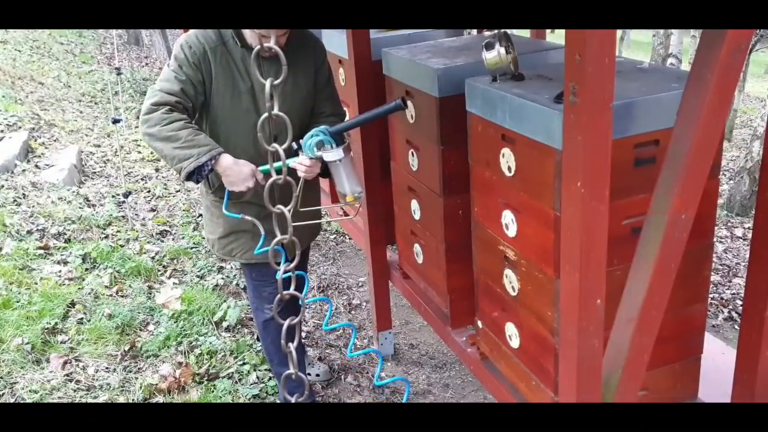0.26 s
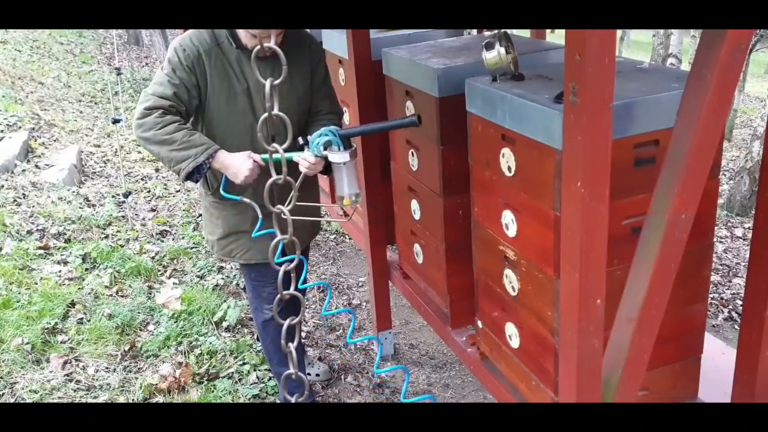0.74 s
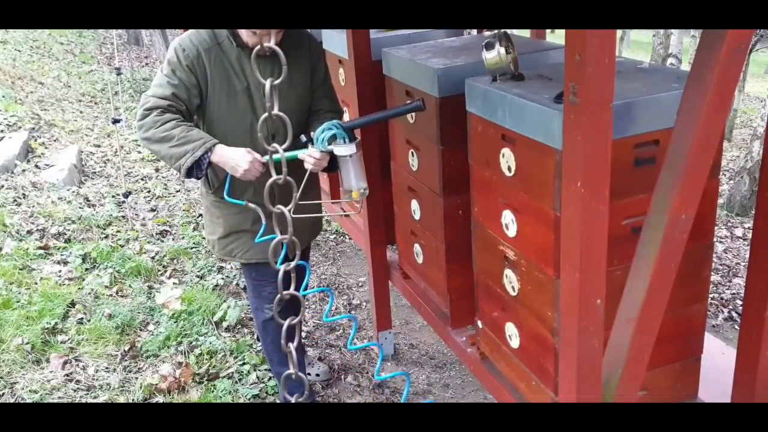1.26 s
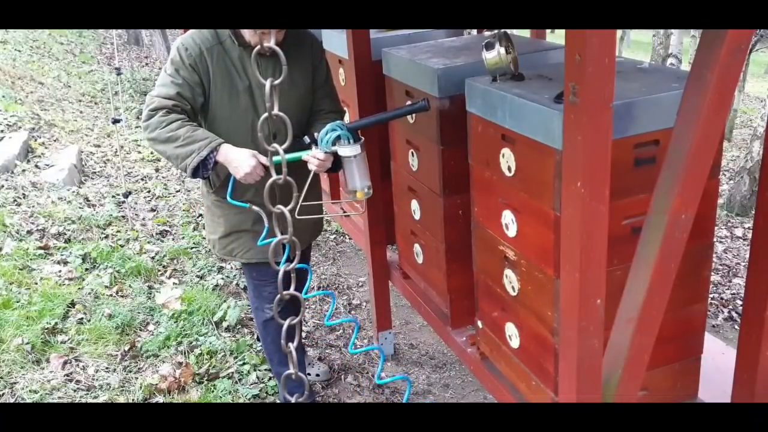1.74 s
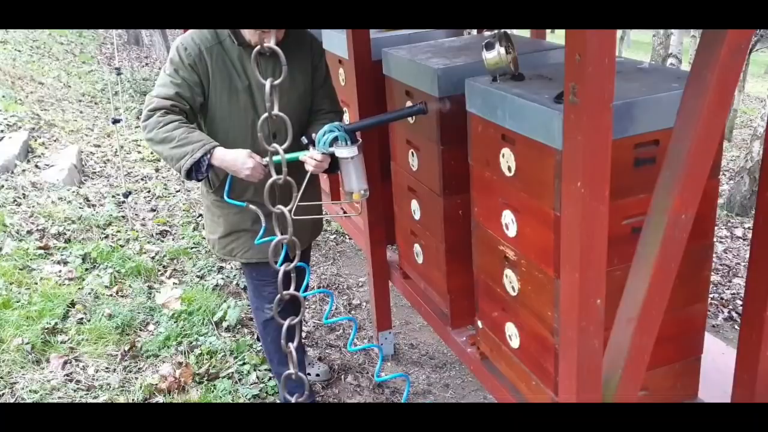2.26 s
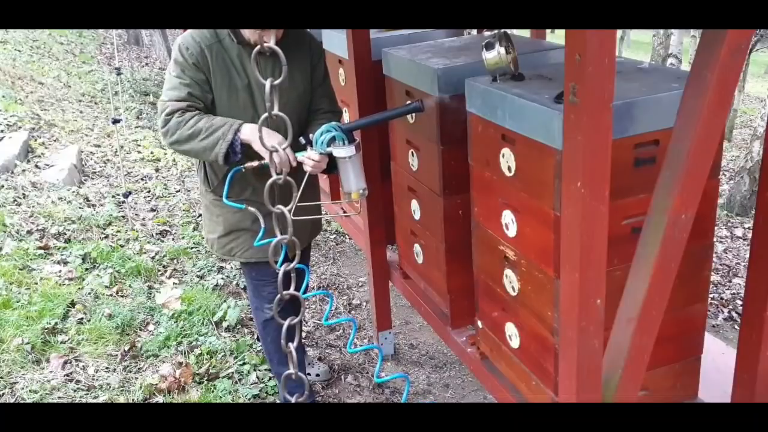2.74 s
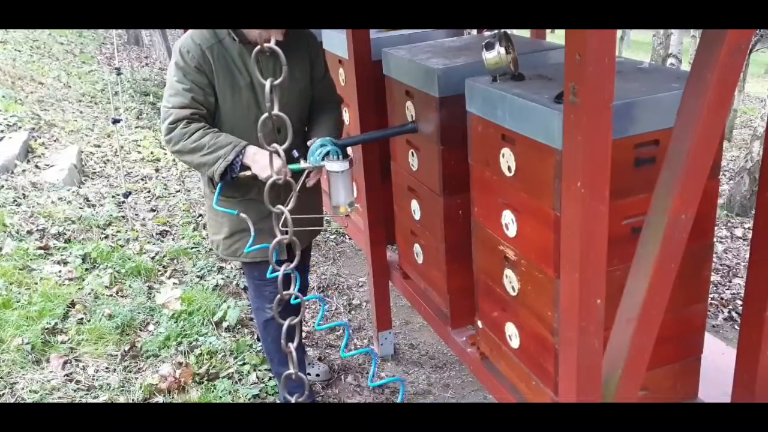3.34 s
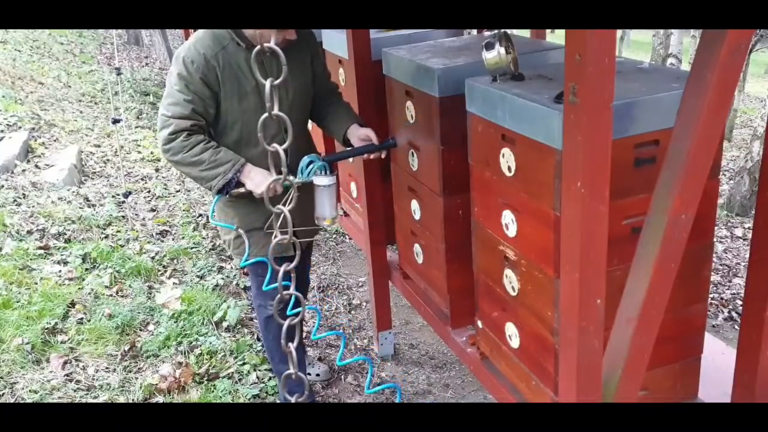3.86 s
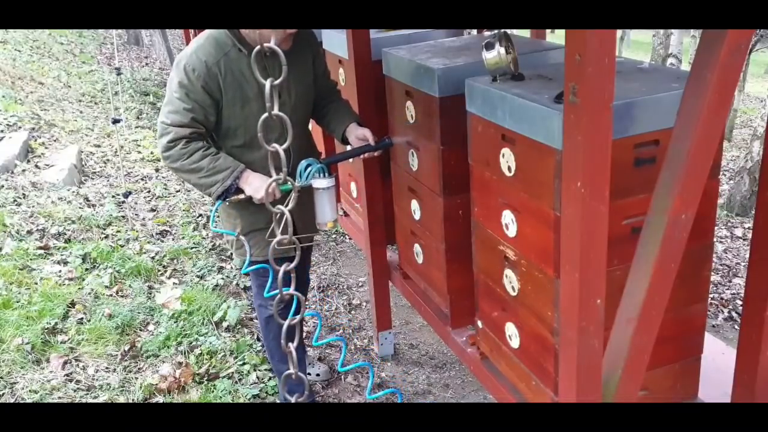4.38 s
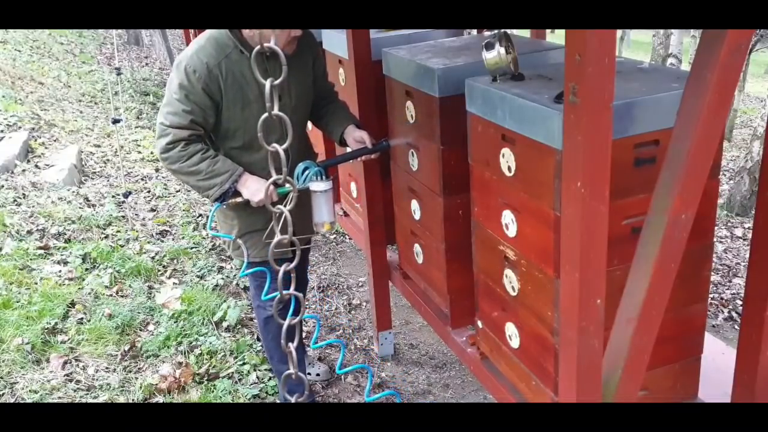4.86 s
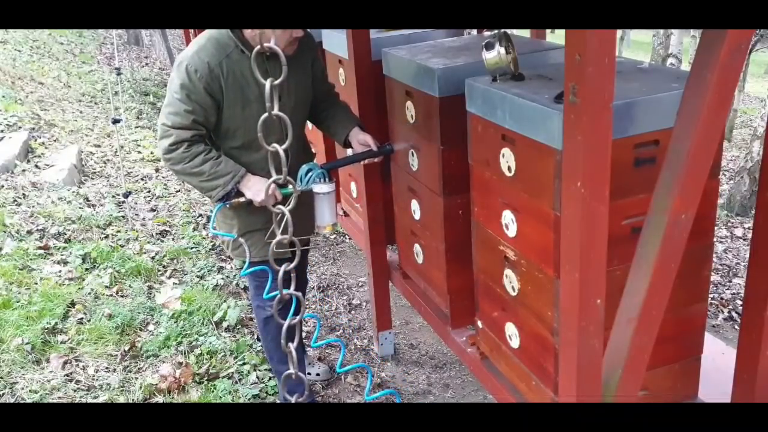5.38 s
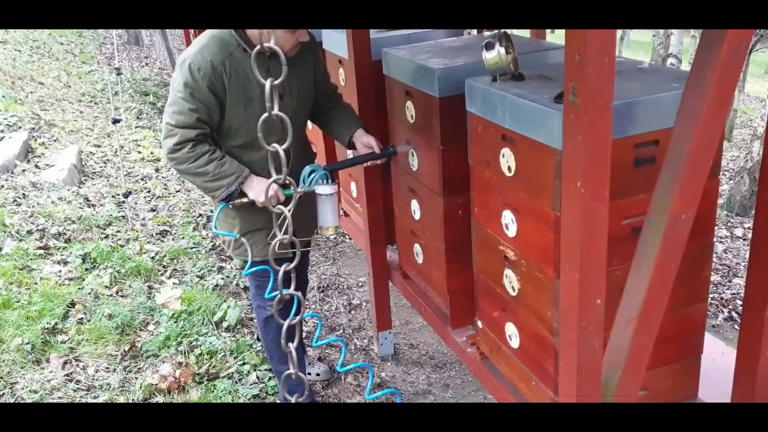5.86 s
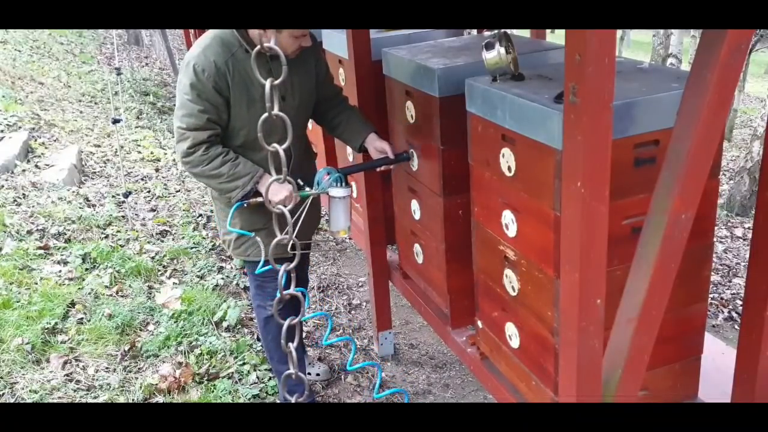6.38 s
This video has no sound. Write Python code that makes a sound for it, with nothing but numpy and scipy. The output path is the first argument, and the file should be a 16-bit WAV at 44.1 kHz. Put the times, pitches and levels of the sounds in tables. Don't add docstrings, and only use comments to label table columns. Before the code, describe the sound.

A compressed-air jet opens in quick jerks beside wooden hive boxes, hissing sharp and bright, then slowly weakening over a faint low engine rumble.

```python
import sys
import numpy as np
from scipy import signal
from scipy.io import wavfile
from scipy.ndimage import uniform_filter1d

SR = 44100
rng = np.random.default_rng(int(sys.argv[2]) if len(sys.argv) > 2 else 0)


def gain_from_decibels(decibels):
    exponent = np.asarray(decibels, float) / 20
    return 10 ** exponent


def digitize_waveform(pressure):
    field = np.atleast_2d(pressure).T
    bounded = np.clip(field, -1, 1)
    quanta = np.round(bounded * 32767).astype(np.int16)
    wavfile.write(sys.argv[1], SR, quanta)


N = 291985
HZ = np.fft.rfftfreq(1024, 1 / SR)[:, None]
FRAME_S = (np.arange(N // 256 + 5) * 256) / SR

# time_s, jet level_db, facing microphone [0-1], striking wood [0-1]
JET = [(.785, -84, 0.7, 0.75), (.82, -82.5, 1, 1), (.93, -75.5, 0.9, 1), (.97, -67, 1, 1),
       (1.06, -60, 0.8, 0.99), (1.31, -52.5, 1, 0.28), (1.5, -50.5, 0.84, 0.24), (1.8, -50, 0.75, 0),
       (2.08, -51.5, 0.75, 0.43), (2.5, -53, 1, 0.44), (2.76, -54, 0.36, 1), (3.3, -55.5, 0.67, 1),
       (3.6, -56.5, 0.45, 0.93), (4.17, -58, 0.1, 0.59), (5.2, -59.5, 0.58, 0.7), (5.45, -59, 0.26, 0.5),
       (6.13, -58.5, 0.08, 0.92), (6.62, -59, 0.4, 0.15)]
# hz, likeness [0-1]
BASS_SAME = [(60, 0.96), (130, 0.49), (290, 0.26), (640, 0.065), (3000, 0.14)]


def evened(x):
    return x / np.sqrt(np.mean(abs(x) ** 2) + 1e-20)


def read(points):
    f, value = np.transpose(points)
    return np.interp(np.log(HZ + 1), np.log(f + 1), value)


def follow(rows, t):
    s, *columns = np.transpose(rows)
    return [np.interp(t, s, c) for c in columns]


def swells(rows, lull_db, t):
    power = sum(gain_from_decibels(2 * db) * np.exp(-(2 * (t - s) / length) ** 2) for s, db, length in rows)
    return 10 * np.log10(power + gain_from_decibels(2 * lull_db))


def patches(bins, frames):
    field = rng.standard_normal((len(FRAME_S), len(HZ))).T
    return evened(uniform_filter1d(uniform_filter1d(field, round(bins), 0), round(frames), 1))


def noise(level_db, same, lead=0.):
    a, b, c, d = rng.standard_normal((len(FRAME_S), len(HZ), 4)).T
    same = np.clip(same, -1, 1)
    left = a + 1j * b
    right = same * left + np.sqrt(1 - same ** 2) * (c + 1j * d)
    right = right * np.exp(-1j * lead)
    spectrum = np.array([left, right]) * gain_from_decibels(level_db)
    return signal.istft(spectrum, nperseg=1024, noverlap=768)[1][:, :N] / 18.5


def band_at_zero(shape_db, lo_hz, hi_hz):
    band = (HZ > lo_hz) & (HZ < hi_hz)
    return shape_db - 10 * np.log10(np.mean(band * gain_from_decibels(shape_db) ** 2))


def fuzzy(hz, db, rough):
    lead_rad, stray_share = -0.36, 0.12
    wander = uniform_filter1d(rng.standard_normal((N // 64 + 1, 4)), 80, 0)
    wander = wander.repeat(64, 0)[:N].T
    shared = rough * evened(wander[0] + 1j * wander[1])
    stray = np.array([[stray_share], [-stray_share]]) * evened(wander[2] + 1j * wander[3])
    phase = 2j * np.pi * np.cumsum(hz) / SR + 1j * lead_rad * np.array([[.5], [-.5]])
    return np.sqrt(2) * gain_from_decibels(db) * ((1 + shared + stray) * np.exp(phase)).real


def engines():
    # middle_s, level_db, length_s
    engine = [(.07, -49.5, 0.12), (.19, -52, 0.11), (.55, -50.5, 0.17), (.73, -47.5, 0.058),
              (.88, -52, 0.075), (1.06, -52, 0.32), (1.24, -52.5, 0.35), (1.62, -50, 0.14),
              (1.84, -58.5, 0.056), (2.08, -53, 0.65), (2.3, -47.5, 0.05), (2.45, -47, 0.029),
              (2.62, -48, 0.12), (2.81, -52, 0.15), (2.98, -47.5, 0.075), (3.25, -48, 0.15),
              (3.62, -52.5, 0.15), (3.88, -51.5, 0.17), (4.09, -54, 0.026), (4.3, -60.5, 0.11),
              (4.52, -53, 0.076), (4.72, -56, 0.12), (5.13, -58.5, 0.33), (5.3, -52, 0.079),
              (5.62, -60, 0.18), (5.8, -57.5, 0.1), (6.23, -52.5, 0.1), (6.55, -55, 0.18)]
    # time_s, pitch_hz
    engine_hz = [(0, 56.4), (.45, 53.3), (1.32, 52.43), (1.55, 53.63), (3.3, 54.58), (3.75, 54.3),
                 (5.85, 55.2), (6.1, 52.97), (6.62, 53.1)]
    # middle_s, level_db, length_s
    octave_swells = [(.5, -62, 0.16), (.88, -56, 0.1), (1.3, -58, 0.12), (4.25, -68.5, 0.12),
                     (5.35, -64.5, 0.18), (6.2, -69, 0.099), (6.55, -72, 0.075)]
    # middle_s, level_db, length_s
    second = [(.16, -58, 0.035), (.6, -58.5, 0.16), (.89, -53.5, 0.053), (1.33, -56.5, 0.086),
              (1.88, -55, 0.071), (2.2, -58.5, 0.49), (2.8, -50.5, 0.049), (3.0, -60, 0.5),
              (3.53, -59.5, 0.085), (3.95, -59.5, 0.43), (4.62, -61, 0.32), (5.22, -56, 0.17),
              (6.25, -61, 0.3)]
    # time_s, pitch_hz, level_db
    drone = [(2.1, 150.6, -79), (2.14, 155.2, -68), (2.178, 154, -71), (2.23, 153.2, -71),
             (2.548, 162, -75.5), (2.7, 150.5, -106)]
    # hz, level_db
    rumble_colour = [(20, -15.5), (45, 18), (86, 11.5), (130, 2), (170, -5), (230, -46), (300, -30),
                     (400, -83)]
    t = np.arange(N) / SR

    hz, db = follow(engine_hz, t)[0], swells(engine, -76, t)
    octave_db = -66 + 3.5 * (53.3 - hz) + 0.23 * (db - db.mean())
    octave_db = 10 * np.log10(gain_from_decibels(2 * octave_db) + gain_from_decibels(2 * swells(octave_swells, -200, t)))
    second_hz, second_db = np.full(N, 66.2), swells(second, -71, t)
    drone_hz, drone_db = follow(drone, t)
    drone_gate = np.clip(8 * np.minimum(t - drone[0][0], drone[-1][0] - t), 0, 1)

    notes = fuzzy(hz, db, 0.35) + fuzzy(2 * hz, octave_db, 0.39)
    notes += fuzzy(second_hz, second_db, 0.54) + fuzzy(2 * second_hz, second_db - 18.5, 0.7)
    notes += fuzzy(drone_hz, drone_db, 1.0) * drone_gate

    rumble_db, fade_db_per_s = -66.5, 0.2
    colour = band_at_zero(read(rumble_colour) - 40 * (HZ > 500), 60, 100)
    rumble_field = colour + rumble_db - fade_db_per_s * FRAME_S + 2.57 * patches(3, 16)
    rumble = noise(rumble_field, read(BASS_SAME))
    pan_db = -4.4 * np.array([[.5], [-.5]])
    return (notes + rumble) * np.minimum(t / .012, 1) * gain_from_decibels(pan_db)


def air():
    # hz, level_db per Hz
    air_colour = [(150, -8), (260, 4), (400, 0), (700, -3), (1400, -9), (2800, -14), (5500, -16),
                  (7600, -17), (8700, -22), (10000, -15), (12000, -12), (16000, -12)]
    # start_s, level_db, length_s
    rustles = [
        (.148, -80.5, .02),
        (.455, -81, .018),
        (.712, -79.5, .03),
    ]
    # middle_s, level_db, length_s, pitch_hz
    rustle_rings = [
        (.158, -82, .02, 7250),
        (.462, -87, .018, 7900),
        (.722, -85, .025, 7600),
    ]

    flat = band_at_zero(-8 * abs(np.log2((HZ + 50) / 7500)), 300, 15700)
    puffs, rings = 0, 0
    for s, db, length in rustles:
        puffs = puffs + gain_from_decibels(2 * db) * np.exp(-((FRAME_S - s - length / 2) / (length / 2)) ** 2)
    for s, db, length, hz in rustle_rings:
        swell_db = swells([(s, db + 18, length)], -200, FRAME_S)
        rings = rings + gain_from_decibels(2 * swell_db) / (1 + ((HZ - hz) / 130) ** 4)
    calm = band_at_zero(read(air_colour), 450, 15000) - 81.5 + 1.0 * patches(12, 10)
    calm = calm - np.array([9, 2])[:, None, None] / (1 + ((HZ - 8500) / 1100) ** 4)
    field = 10 * np.log10(gain_from_decibels(2 * calm) + puffs * gain_from_decibels(2 * flat) + rings)
    return noise(field, read(BASS_SAME)) * gain_from_decibels([[1.5], [4.0]])


def valve_whistle():
    # time_s, level_db
    whistle = [(0.78, -101), (0.818, -79), (0.852, -89), (0.92, -91), (0.99, -91), (1.06, -86), (1.14, -85),
               (1.158, -108), (1.18, -116)]
    sounding = (FRAME_S > whistle[0][0]) & (FRAME_S < whistle[-1][0])
    resonance_db = -20 * np.log10(1 + ((HZ - 1170) / 25) ** 2)
    return follow(whistle, FRAME_S)[0] + 29 + resonance_db - 80 * ~sounding


def hiss(level_db, facing, striking):
    # hz, level_db per Hz
    jet_colour = [(300, -35), (900, -22), (1500, -26.5), (2000, -22), (2900, -31), (3510, -24.5),
                  (4270, -12), (5320, -9), (6200, -10), (7550, -8), (8930, -9), (13000, 4.5), (16000, -4.5)]
    colour = read(jet_colour)
    choked_db = 0.24 * np.maximum(-58.5 - level_db, 0)
    flutter = evened(uniform_filter1d(rng.standard_normal(len(FRAME_S)), size=7))

    top_db = -0.1 + (6 + 0.1) * facing
    low_db = -9.5 + (-7 + 9.5) * striking - choked_db
    lowest_db = -23 + (-10.5 + 23) * striking + 2.5 * flutter
    lowest_edge_hz = 4770 + (4030 - 4770) * striking

    body = band_at_zero(colour, 8100, 10750) + level_db
    for lo_hz, hi_hz, over_db, share in [(10000, 14430, top_db, (HZ - 10000) / 2000),
                                         (4050, 6160, low_db, (6400 - HZ) / 400),
                                         (2940, 4480, lowest_db, (lowest_edge_hz - HZ) / 300)]:
        share = np.clip(share, 0, 1)
        body = (1 - share) * body + share * (band_at_zero(colour, lo_hz, hi_hz) + level_db + over_db)

    wash = colour - 51 + 0.043 * (level_db + 74.5) - choked_db - 80 * (FRAME_S < JET[0][0])
    upper_wash = wash * (HZ < 3300) - 200 * (HZ >= 3300)
    body = np.where(HZ < 2700, wash, np.maximum(body, upper_wash))

    glance_db = -1 * striking * facing * np.maximum(HZ - 13500, 0) / 1000
    sputter = evened(uniform_filter1d(rng.standard_normal(len(FRAME_S)), 5))
    streaks = np.clip((7500 - HZ) / 1500, 0, 1) * patches(bins=2.6, frames=15)
    return body + glance_db + 0.35 * sputter + 1.0 * patches(8, 12) + 3.18 * streaks


def standing_waves(depth):
    tube_hz = [3850, 4070, 4280, 4540, 4970, 5170, 5470, 5670, 5870, 6220, 6600, 7340, 7740, 8050, 10280,
               11400, 12670, 13900, 15130, 12050, 15600]
    # width_hz, left_db, right_db
    tube = [(152, 6.5, -6), (110, -7, -5), (85, 10.5, 3), (120, -10.5, -13), (104, -8.5, -3), (137, 6, 2.5),
            (171, 0, 7.5), (112, -10, -9), (160, -1.5, 5.5), (214, 0.5, -7), (167, 6, 0), (168, -18, 2.5),
            (237, -1, 6), (168, -1.5, -2.5), (260, 3, 4.5), (230, 1.5, 5), (250, 1, 1.5), (296, 2, 0),
            (263, 7.5, 2), (302, 0, -2), (420, 5, 5)]
    # centre_hz, width_hz, left_db, right_db
    later = [(2640, 170, 2, -0.5), (3170, 93, -5.5, 0), (3870, 130, -1, 7.5), (4320, 110, -1.5, -4.5),
             (4790, 200, -5, -0.5), (5120, 170, -2, 0.5), (5450, 150, 3, -2), (5620, 150, -4.5, 3),
             (5860, 440, 4.5, -3), (6150, 180, -3, -7), (7050, 270, -3, 0), (8030, 200, 2.5, -4.5),
             (9400, 1400, -2.5, -1), (10250, 190, -1, -1), (11600, 2000, 2.5, 0.5), (12400, 210, -7, -1),
             (14300, 440, 5.5, -2.5), (15800, 500, -1.5, -1)]
    width, *port_db = np.transpose(tube)
    shapes = 1 / (1 + (2 * (HZ - tube_hz) / width) ** 4)
    ripple = depth * (shapes @ np.array(port_db)[:, :, None])

    later_hz, later_width, *later_db = np.transpose(later)
    later_shapes = 1 / (1 + (2 * (HZ - later_hz) / later_width) ** 4)
    shift = later_shapes @ np.array(later_db)[:, :, None]
    from_s, over_s = 3.35, .45
    return ripple + shift * np.clip((FRAME_S - from_s) / over_s, 0, 1)


def glints():
    # middle_s, length_s, pitch_hz, level_db, left_minus_right_db
    glint_rows = [(0.96, 0.25, 4050, 4.5, -3), (1.02, 0.21, 4440, 5, -1), (1.23, 0.37, 3500, 6.5, 7),
                  (0.93, 0.2, 6600, -9, 6), (1.1, 0.45, 9330, 4.5, -6), (1.2, 0.19, 16000, -1.5, -4),
                  (1.07, 0.58, 11000, 1.5, 5.5), (1.37, 0.36, 12000, -4, -0.5), (1.3, 0.28, 7400, -1, 6),
                  (1.56, 0.36, 3550, -9, -1), (1.71, 0.33, 4800, -11.5, 5), (2.02, 0.55, 3920, -13.5, -6),
                  (1.66, 0.89, 7080, -1.5, 0), (1.95, 0.53, 10250, -1.5, 6), (1.83, 0.45, 13800, 2.5, -1),
                  (2, 0.39, 15800, 0, -2), (2.29, 0.37, 4600, -4, 0.5), (2.64, 0.55, 13000, -3, 2),
                  (2.67, 0.47, 7200, -3, 5), (2.9, 0.75, 15200, 7, 0), (3.38, 0.62, 4030, -8.5, 12),
                  (3.2, 0.51, 16000, -1.5, -1), (3.65, 0.19, 13400, -4, 0), (4.106, 0.35, 4980, -8.5, -2),
                  (6.2, 0.66, 10940, 5, 7), (5.3, 0.57, 5100, 1, 0.5), (3.1, 0.86, 15100, 1, -2),
                  (5.23, 0.62, 4220, 3.5, -5), (5.66, 0.9, 3730, -4, -1.5), (5.9, 1.1, 8700, 2.5, -1.5),
                  (5.2, .5, 11000, -3.5, 2), (6.104, 0.47, 5600, -5, 2), (6.397, .4, 20000, -3, 2),
                  (3.59, .3, 7500, -5, -1.5), (3, 0.18, 2900, -13, -4), (2.05, 0.24, 4700, -9, 10),
                  (6.05, 0.38, 4080, -9.5, -1), (3, 0.19, 5000, 3.5, -1), (5.1, 0.29, 4300, 1.5, 2.5),
                  (0.58, 0.24, 8900, -10, -2)]
    spread = 0.21
    s, length, hz, *shift_db = np.transpose(glint_rows)
    when = np.exp(-(2 * (FRAME_S - s[:, None]) / length[:, None]) ** 2)
    where = np.exp(-(2 * (HZ / hz - 1) / spread) ** 2)
    return [where * db @ when for db in shift_db]


def tube_tone(level_db, striking):
    # middle_s, length_s, level_db, pitch_hz
    catches = [(0.883, .09, -80, 7600), (1.088, 0.12, -76.5, 2330), (2.056, 0.013, -67, 2370),
               (2.487, 0.2, -71.5, 2354), (2.923, 0.71, -72, 2333), (3.1, 0.038, -65, 2590),
               (3.343, 0.048, -63.5, 2525), (3.4, 0.059, -69, 2600), (3.428, 0.082, -68, 2770),
               (3.976, 0.11, -73, 2326), (4.36, 0.16, -77, 2390), (4.65, 0.085, -74, 2540),
               (4.942, 0.21, -80, 2470), (5.988, 0.24, -81, 2510), (6.396, 0.11, -73.5, 2560),
               (6.407, 0.23, -75.5, 2150)]
    rest_db = -88 - 6 * (0.5 - striking)
    tone = gain_from_decibels(2 * rest_db) / (1 + (abs(HZ - 2513) / 120) ** 3) * (level_db > -65)
    for s, length, db, hz in catches:
        swell_db = swells([(s, db, length)], -200, FRAME_S)
        tone = tone + gain_from_decibels(2 * swell_db) / (1 + (abs(HZ - hz) / 40) ** 6)
    return 10 * np.log10(tone) + 18 + 3.3 * patches(3, 9)


def jet():
    # time_s, depth_factor
    aim = [(.8, .45), (1.15, .55), (1.4, 1.0), (2.7, 1.0), (3.1, .75), (3.6, .55), (6.62, .55)]
    # time_s, left_minus_right_db
    pan = [(.8, -2.5), (2.2, -2), (3.5, -2.5), (3.9, -1.5), (6.62, -2.5)]
    # hz, left_minus_right_db
    shadow = [(2500, 0.5), (6000, 1), (7000, -1.5), (8800, -4), (10000, -5), (11500, -4.5), (12500, 3.7),
              (16000, 0)]
    # hz, left-right likeness [0-1]
    jet_same = [(1000, .3), (3000, .3), (6000, .38), (9000, .6), (15000, .7)]
    # hz, left port lead_rad
    port_lead = [(0, 0), (690, -0.5), (2840, 0.1), (3450, 1.1), (4310, -1.4), (5510, -1.5), (7060, -3.6),
                 (7920, -4.5), (8180, -3.3), (9390, -3.4), (10100, -2.8), (11300, -4.0), (14000, -4.7),
                 (16300, -6.1)]
    # time_s, jump_db, settling_s
    valve_steps = [
        (.818, 3.5, 0.025),
        (.952, 3, .03),
    ]

    level_db, facing, striking = follow(JET, FRAME_S)
    level_db = level_db - 80 * (FRAME_S < JET[0][0])
    depth = follow(aim, FRAME_S)[0]
    glint_db, glint_pan_db = glints()

    body = hiss(level_db, facing, striking) + glint_db + standing_waves(depth)
    tone = tube_tone(level_db, striking)
    field = 10 * np.log10(gain_from_decibels(2 * body) + gain_from_decibels(2 * tone) + gain_from_decibels(2 * valve_whistle()))
    pan_db = follow(pan, FRAME_S)[0] + depth * read(shadow) + glint_pan_db
    field = field + np.array([.5, -.5])[:, None, None] * pan_db

    t = np.arange(N) / SR
    jerk_db = 0
    for s, db, settle in valve_steps:
        jerk_db = jerk_db + db / 2 * np.sign(t - s) * np.exp(-abs(t - s) / settle)
    return gain_from_decibels(jerk_db) * noise(field, read(jet_same), read(port_lead))


def scene():
    return gain_from_decibels(5.0) * jet() + engines() + air()


def coverage(boxes, t, hz):
    start, end, lo_hz, hi_hz = np.transpose(boxes)
    in_band = 1. * ((hz > lo_hz) & (hz < hi_hz))
    return in_band @ (1. * ((t > start[:, None]) & (t < end[:, None])))


def drop_weak_bands(x):
    # start_s, length_s
    starved = [(.945, .015), (1.182, .087), (1.324, .022), (1.716, .015), (1.836, .012), (1.951, .012),
               (2.3, .035), (2.671, .015), (2.764, .012), (3.482, .04), (3.594, .037), (3.714, .015),
               (3.879, .03), (4.176, .042), (4.55, .032), (4.662, .09), (4.804, .04), (5.059, .012),
               (5.148, .045), (5.241, .067), (5.365, .037), (5.478, .012), (5.62, .015), (5.71, .015),
               (5.752, .022), (5.802, .015), (6.291, .017), (6.336, .037)]
    # from_s, to_s, low_hz, high_hz
    given_up = [(.83, 1.0, 1600, 1900), (.92, 1.0, 2100, 2950), (1.04, 1.1, 1400, 1900),
                (.9, 1.03, 6050, 6400), (1.09, 1.2, 6050, 6350), (1.26, 2.66, 6080, 6400),
                (1.65, 1.82, 4600, 5050), (1.9, 2.03, 4650, 5050), (1.32, 1.5, 3800, 4100),
                (3.92, 4.1, 4400, 4650), (6.0, 6.25, 6050, 6300), (1.52, 1.57, 2500, 3700),
                (1.33, 1.5, 3200, 3300), (1.96, 2.0, 2900, 3300), (2.07, 2.13, 2500, 4150),
                (1.84, 1.89, 3550, 3700), (2.26, 2.32, 3500, 3800), (2.36, 2.42, 3150, 3900),
                (2.1, 2.4, 4900, 5000), (2.12, 2.35, 4450, 4560), (2.9, 3.12, 6200, 6400),
                (2.92, 3.1, 3500, 3620), (1.0, 1.06, 2800, 2950), (1.04, 1.09, 300, 900),
                (.95, 1.0, 430, 560), (6.38, 6.5, 5550, 5700), (1.19, 1.26, 2000, 3200),
                (3.13, 3.47, 6180, 6300), (3.55, 3.62, 6000, 6200), (3.33, 3.47, 3900, 4020),
                (2.7, 2.76, 6100, 6350), (2.68, 2.95, 2050, 2180), (3.2, 3.3, 3400, 4200),
                (4.2, 4.36, 3400, 3600), (4.45, 4.74, 3400, 3620), (4.86, 5.1, 3420, 3600),
                (5.17, 5.4, 3400, 3600), (5.45, 6.15, 4450, 4600), (5.71, 5.81, 3100, 3650),
                (6.38, 6.45, 4650, 5000)]
    # from_s, to_s, low_hz, high_hz
    left_given_up = [(1.44, 1.5, 7980, 8080), (1.63, 1.76, 7950, 8120), (1.95, 2.13, 7930, 8100),
                     (2.13, 2.2, 8050, 8200), (2.22, 2.28, 7850, 7980), (1.46, 1.62, 7300, 7400),
                     (1.73, 1.8, 7200, 7350), (1.86, 1.94, 7300, 7400), (2.08, 2.42, 7320, 7450),
                     (1.5, 1.56, 6830, 6930), (1.42, 1.5, 3600, 3950), (1.72, 1.8, 3500, 4150),
                     (1.9, 2.02, 3350, 4150), (2.12, 2.28, 3750, 4000)]

    hz, t, z = signal.stft(x, SR, nperseg=2048, noverlap=1536)
    hz, power = hz[:, None], abs(z) ** 2 + 1e-20
    band_power = uniform_filter1d(uniform_filter1d(power.mean(0), size=5, axis=0), size=3, axis=1)
    band_db = 10 * np.log10(band_power)
    near_db = uniform_filter1d(band_db[12:], size=55, axis=0)
    near_db = np.vstack([near_db[:12], near_db])

    thrift = rng.standard_normal((len(t) // 2 + 1, len(hz) // 8 + 1))
    thrift = evened(uniform_filter1d(thrift, size=2, axis=0))
    thrift = thrift.repeat(2, 0).repeat(8, 1).T[:len(hz), :len(t)]
    budget_db = 3.6 * thrift

    busy = (band_db[400:700].mean(0) > -93) & (t > JET[0][0]) & (hz > 175) & (hz < 8400)
    empty = band_db < near_db - np.where(hz < 6500, 5.0, 7.0) + budget_db
    small = 10 * np.log10(power) < near_db - 1.0 + budget_db
    gain_db = -16 * (busy & small & (hz < 6800))
    gain_db = gain_db - 30 * (busy & empty)

    port_db = 10 * np.log10(uniform_filter1d(uniform_filter1d(power, size=7, axis=1), size=4, axis=2))
    port_weak = port_db < near_db - 5.6 + .3 * budget_db
    gain_db = gain_db - 25 * (port_weak & (hz > 6900) & (hz < 12500))

    plain = (hz > 250) & (hz < 3400) & ((band_db < near_db + 2) | (hz < 2000))
    for s, length in starved:
        gap = abs(t - s - length / 2) < length / 2 + .006
        gain_db = gain_db - 66 * length / (length + .04) * gap * plain

    gain_db = gain_db - 30 * coverage(given_up, t, hz) * (thrift > -1.9)
    left = np.array([1, 0])[:, None, None]
    gain_db = gain_db - 25 * left * coverage(left_given_up, t, hz) * (thrift > -1.5)
    gain_db = gain_db - 60 * (hz > 15780)
    return signal.istft(z * gain_from_decibels(gain_db), SR, nperseg=2048, noverlap=1536)[1][:, :N]


def band_limit(x):
    return signal.sosfilt(signal.butter(12, 16720, fs=SR, output="sos"), x)


def record(dry):
    bass_cut = signal.butter(4, 42, "high", fs=SR, output="sos")
    mix = drop_weak_bands(signal.sosfilt(bass_cut, dry))
    return band_limit(mix)


dry = scene()
out = record(dry)
digitize_waveform(out)
```